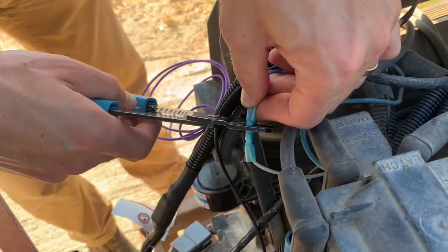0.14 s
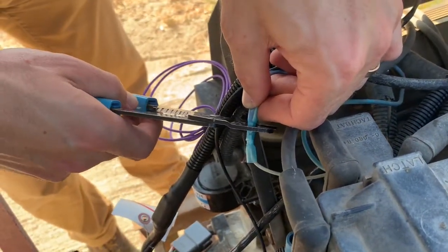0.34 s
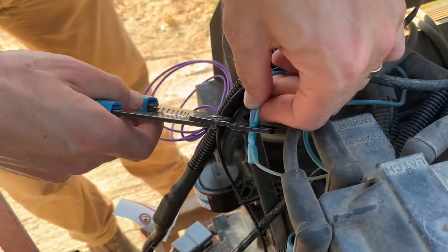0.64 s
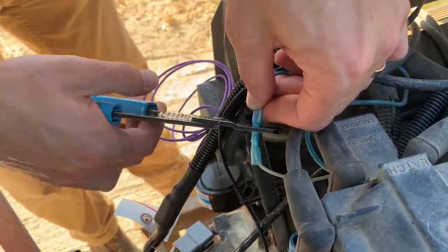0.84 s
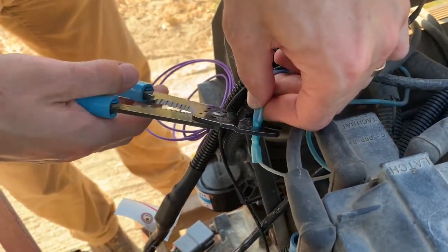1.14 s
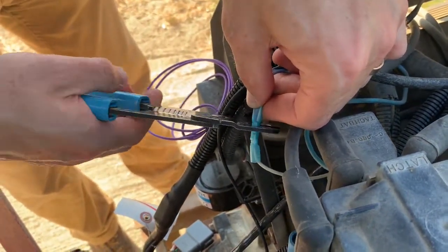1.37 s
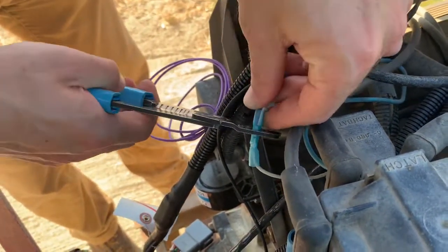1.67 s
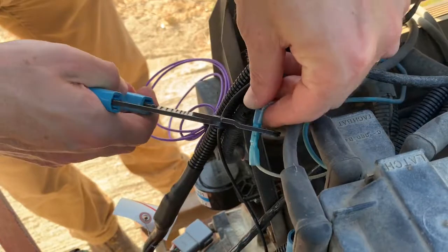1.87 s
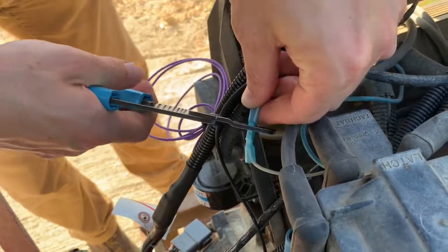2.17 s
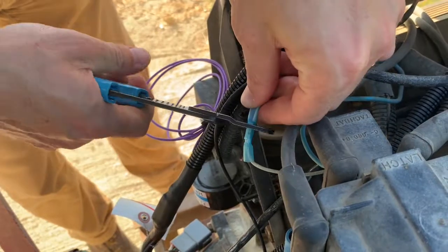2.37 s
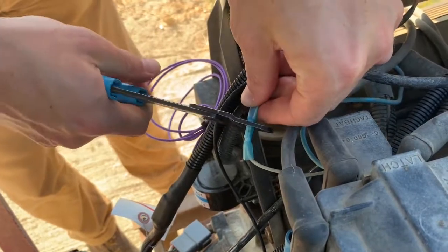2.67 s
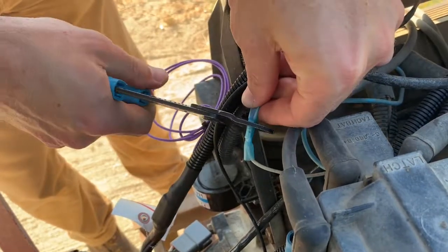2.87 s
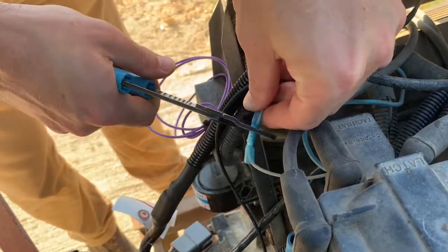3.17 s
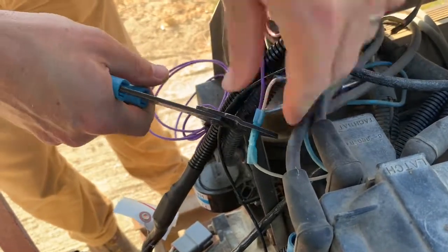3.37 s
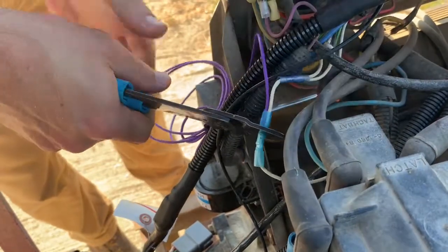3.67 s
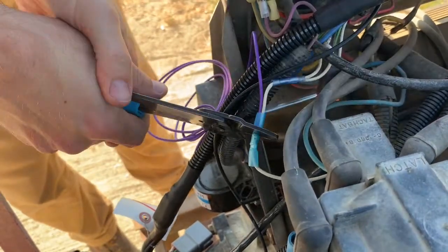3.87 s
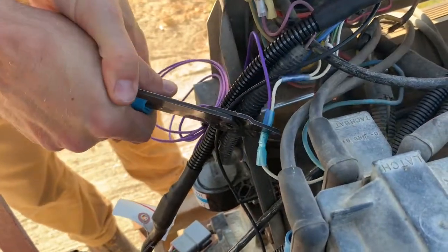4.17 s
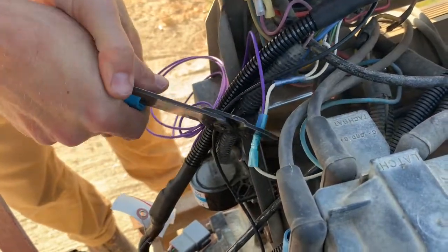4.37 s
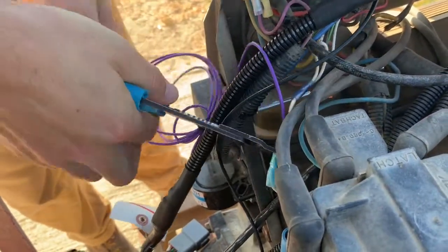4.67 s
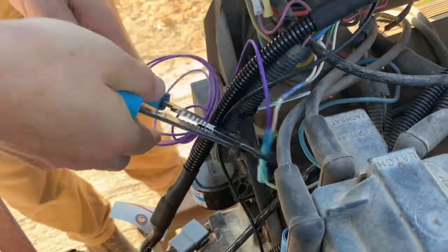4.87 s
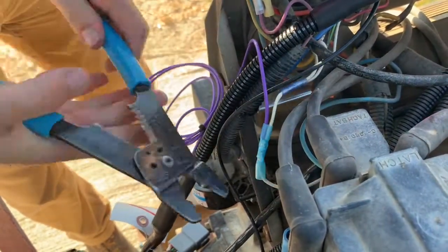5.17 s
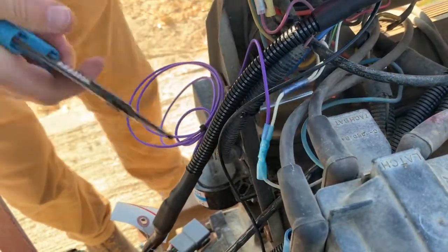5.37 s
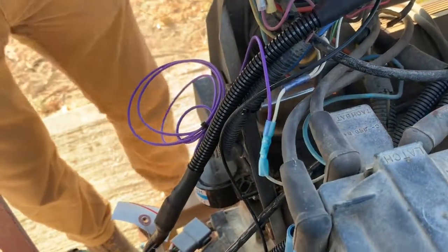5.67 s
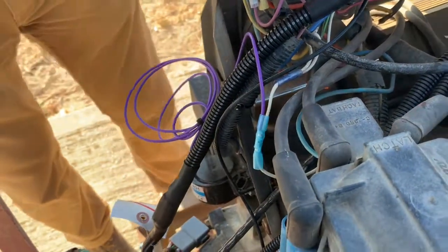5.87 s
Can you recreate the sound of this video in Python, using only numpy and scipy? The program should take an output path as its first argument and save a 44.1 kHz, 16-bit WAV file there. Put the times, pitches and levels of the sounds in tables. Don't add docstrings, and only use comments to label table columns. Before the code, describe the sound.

An uneven engine idles low nearby while hands rustle and tick at a tool, which finally snaps shut with a bright steel click.

```python
import sys
import numpy as np
from scipy import signal
from scipy.fft import rfft, irfft, next_fast_len
from scipy.io import wavfile

SR = 44100
rng = np.random.default_rng(int(sys.argv[2]) if len(sys.argv) > 2 else 0)


def how_loud(loudness_db):
    steps = np.asarray(loudness_db, float) / 20
    return 10 ** steps


def inscribe(sig):
    pcm = np.round(np.clip(np.atleast_2d(sig).T, -1, 1) * 32767)
    wavfile.write(sys.argv[1], SR, pcm.astype(np.int16))


N = 265923


def rms_one(x):
    return x / np.sqrt(np.mean(x ** 2) + 1e-20)


def in_time(rows):
    s, *columns = np.transpose(rows)
    return [np.interp(np.arange(N) / SR, s, c) for c in columns]


def at_hz(points, hz):
    table_hz, values = np.transpose(points)
    return np.interp(np.log(hz + 1), np.log(table_hz + 1), values)


def drift(rate):
    r = np.exp(-80 * np.pi * rate / SR)
    white = rng.standard_normal(N // 40 + 2002)
    slow = signal.lfilter([1], [1, -2 * r, r * r], white)[2000:]
    return np.interp(np.arange(N) / 40, np.arange(len(slow)), rms_one(slow))


def ring(clicks, hz, t60):
    r = np.exp(-np.log(1000) / (t60 * SR))
    w = 2 * np.pi * hz / SR
    return signal.lfilter([0, np.sin(w)], [1, -2 * r * np.cos(w), r * r], clicks + 1e-18)


def add(out, s, piece):
    i = round(s * SR)
    out[i:i + len(piece)] += piece[:len(out) - i]


def tone(hz, db, multiple=1, waver_db=1.5, slip=.3):
    phase = 2 * np.pi * multiple * np.cumsum(hz) / SR + 2.15 + slip * drift(3)
    return np.sqrt(2) * how_loud(db + waver_db * drift(5.6)) * np.sin(phase)


# (f/Hz, share [0-1])
LIKENESS = [(30, .45), (70, .8), (130, .95), (300, .8), (700, .45), (2000, .3), (5000, .4), (8000, .55),
            (9200, .75), (11000, .965)]


def banded_noise(spectrum, low_hz, count, patchy_db, shared):
    out = 0
    together = .3 * drift(.8) + drift(8)
    edges = low_hz * 2 ** (np.arange(count + 1) / 3)
    white = rng.standard_normal((2, 3, N))
    for k, (low, high) in enumerate(zip(edges, edges[1:])):
        hz = np.sqrt(low * high)
        alike = np.clip(at_hz(LIKENESS, hz), 0, 1)
        gain = how_loud(at_hz(spectrum, hz) + patchy_db * (shared * together + drift(19.0)))
        band_pass = signal.butter(2, [low, high], "band", fs=SR, output="sos")
        band = signal.sosfilt(band_pass, white[k % 2])
        out = out + gain * band * np.sqrt([[alike], [1 - alike], [1 - alike]])
    return out / np.sqrt(np.mean(out[0] ** 2 + out[1] ** 2))


# (f/Hz, level/dB per Hz)
RUMBLE = [(20, 0), (48, -3.5), (80, -2.5), (125, -3), (170, -21), (246, -17), (335, -28), (420, -30.5),
          (1060, -27.5), (1400, -46)]


def rumble():
    return how_loud(-46.5) * banded_noise(RUMBLE, 19.82, count=18, patchy_db=3.0, shared=0.12)


# (f/Hz, level/dB per Hz)
HISS = [(760, -35), (1300, -8), (1670, -8.5), (2120, -2.5), (2980, -2.5), (4070, -4), (5120, 1), (5860, -7),
        (6370, -5), (6990, -7), (9160, -5), (11600, -5.5), (14600, -3.5)]
# (t/s, level/dB)
BREEZE = [
    (0, -1.5),
    (.25, 0.5),
    (2.2, 2),
    (4.2, 3.5),
    (5.2, 1.5),
    (6.03, 0),
]


def hiss():
    level = how_loud(-54 + in_time(BREEZE)[0])
    return level * banded_noise(HISS, 1289, count=11, patchy_db=1.8, shared=0.4)


# (t/s, f/Hz)
HUM_LOW = [(0, 62.7), (1, 61), (1.3, 63), (3.1, 63.2), (3.5, 65), (4.4, 64.7), (4.75, 60.2), (5.4, 59.5),
           (6.03, 62.5)]


def hums():
    t = np.arange(N) / SR
    from_nearest_s = t - 4.9
    nearing_db_per_s, leaving_db_per_s = 1.5, .5
    off_db = np.maximum(-nearing_db_per_s * from_nearest_s, leaving_db_per_s * from_nearest_s)
    low = tone(in_time(HUM_LOW)[0], -47)
    high_hz = 71.1 + .2774 * t
    return low + tone(high_hz, -46.5 - off_db)


# (t/s, f/Hz)
VEHICLE = [(0, 100), (.49, 101.4), (1, 105.6), (1.36, 104.5), (1.7, 108.3), (2.1, 106.5), (2.5, 108),
           (2.75, 108.6), (3.33, 110), (3.56, 112), (3.97, 111.9), (4.4, 113.6), (4.8, 114.7), (5.3, 115.6),
           (6.03, 117.6)]
# (multiple of firing rate, level/dB re whine, hidden from t/s)
WHINE = [(3, 0, 4.9), (4, -15, .45), (5, -15, .8), (6, -9, 3.5), (8, -15, 1.4), (9, -9, 1.35),
         (10, -12, 2.6)]


def vehicle():
    (hz,), t = in_time(VEHICLE), np.arange(N) / SR
    fade_db_per_s, hidden_db_per_s = 4, 66
    whine_db = -59 - fade_db_per_s * np.maximum(t - 1.39, 0)
    shut_db = np.interp(t, [.35, .7], [-12, 0])
    whine = 0
    for k, db, hidden_s in WHINE:
        shadow_db = hidden_db_per_s * np.maximum(t - hidden_s, 0)
        order_db = whine_db + db + shut_db * (k > 5) - shadow_db
        whine = whine + tone(hz, order_db, multiple=k, slip=.5)
    return tone(hz, -44.5) + whine


# (multiple of firing rate, level/dB)
TURNED = [
    (4, -74),
    (7, -75),
]


def vehicle_turned():
    t = np.arange(N) / SR
    turn_s, turn_takes_s, gone_s, fade_s = 4.55, .3, 5.75, .15
    turned = np.clip(np.minimum((t - turn_s) / turn_takes_s, (gone_s - t) / fade_s), 0, 1)
    (hz,) = in_time(VEHICLE)
    return turned * sum(tone(hz, db, multiple=k, waver_db=2.0, slip=.7) for k, db in TURNED)


# (t/s, firings [1/s])
IDLE = [(0, 22.194), (.5, 21.939), (1, 21.526), (1.45, 21.549), (1.6, 21.326), (1.75, 21.511),
        (1.95, 20.429), (2.3, 20.069), (2.6, 19.549), (3.3, 19.795), (3.6, 19.61), (4.2, 19.607),
        (4.45, 20.447), (4.7, 20.592), (4.95, 21.332), (5.25, 22.603), (5.6, 21.918), (6.03, 21.84)]
# (t/s, level/dB, extra level/dB of the upper exhaust notes)
LOAD = [(0, 1, 2), (1.15, 1.5, -2), (1.35, 2.5, 3.5), (1.55, -6.5, 11), (1.9, -0.5, 5), (2.7, 0, 3.5),
        (4.2, 0, 6), (5.3, 3.5, 1.5), (6.03, 2, -4)]
# (f/Hz, level/dB, t60/s, sign)
EXHAUST = [(44, -51, .2, 1), (80, -48, .25, 1), (93, -43, .4, 1), (116.8, -28.5, .134, -1),
           (147.6, -40, .046, 1), (187, -51, .12, 1)]


def idling_engine():
    (per_s,), (level_db, upper_db) = in_time(IDLE), in_time(LOAD)
    turns = .42 + np.cumsum(per_s) / SR + .011 * drift(2)
    fired = np.diff(np.floor(turns), prepend=0) > 0
    puffs = fired * how_loud(level_db + 1.0 * drift(12))
    pipe = 0
    for hz, db, t60, sign in EXHAUST:
        drive = puffs * how_loud(upper_db * (hz > 140))
        pipe = pipe + sign * how_loud(db) * ring(drive, hz, t60)
    return signal.sosfilt(signal.butter(4, 230, fs=SR, output="sos"), pipe)


# (start t/s, length/s, level/dB, centre f/Hz)
SHIFTS = [(0.152, 0.094, -62.5, 3750), (0.257, 0.1, -73, 2900), (0.167, 0.17, -64, 7600),
          (0.203, 0.095, -67.5, 1170), (0.467, 0.63, -61, 8650), (0.496, 0.8, -64, 11000),
          (0.55, 0.66, -82, 14800), (0.607, 0.15, -58.5, 7100), (0.777, 0.15, -55.5, 7200),
          (0.948, 0.16, -58.5, 6900), (0.537, 0.62, -60.5, 13000), (1.417, 0.76, -64, 3670),
          (1.441, 0.68, -64, 2600), (1.446, 0.75, -63, 5000), (1.53, 0.4, -66.5, 7000),
          (2.177, 0.8, -61, 13000), (2.203, 0.62, -66, 8100), (2.842, 0.45, -68.5, 4800),
          (3.135, 0.25, -77, 2270), (3.353, 0.15, -67, 4600), (3.797, 0.094, -60, 3100),
          (3.896, 0.059, -60, 3500), (3.8, 0.16, -65, 2240), (4.252, 0.13, -62.5, 3500),
          (4.44, 0.13, -61.5, 3500), (3.747, 1.7, -68.5, 8650), (5.417, 0.12, -64.5, 3550),
          (3.758, 0.15, -59.5, 345), (1.548, 0.085, -63, 1230), (5.938, 0.038, -63, 590),
          (4.6, .7, -67.5, 330), (0.1, 0.343, -72.5, 1700)]


def grip():
    slips_per_s, slip_cycles, spread_oct = 1200, 55, .17
    attack_s, release_s = .0087, .0066
    sizes = how_loud(3.0 * np.minimum(rng.exponential(1, N), 4)) * rng.choice([-1, 1], N)
    chance, clumps = rng.random(N), how_loud(3.9 * drift(16))
    dealt = rng.integers(0, 6, N)
    out = np.zeros(N)
    for (s, length_s, db, hz), notes in zip(SHIFTS, rng.uniform(-1.34, 1, (len(SHIFTS), 6))):
        t = np.arange(int((length_s + release_s) * SR)) / SR
        part = (int(s * SR) + np.arange(len(t))) % N
        slips = sizes[part] * (chance[(part * 7) % N] < slips_per_s * clumps[part] / SR)
        offsets_oct = spread_oct * (np.linspace(-1, 1, 6) + .2 * notes)
        pitches = np.minimum(hz * 2 ** offsets_oct, 15000)
        rustle = sum(ring(slips * (dealt[part] == k), f, slip_cycles / f) for k, f in enumerate(pitches))
        shape = np.clip(np.minimum(t / attack_s, (t[-1] - t) / release_s), 0, 1)
        add(out, s, how_loud(db) * shape * rms_one(rustle))
    return out


# (start t/s, length/s, level/dB, f/Hz)
SQUEAKS = [(0.179, 0.067, -66, 4030), (0.182, 0.07, -68, 3780), (0.304, 0.035, -63, 3180),
           (0.38, .04, -71, 3260), (0.661, 0.049, -59, 6700), (0.801, 0.072, -57.5, 9000),
           (0.818, 0.037, -58, 5840), (3.306, 0.078, -65, 2520), (3.336, 0.063, -67, 2100),
           (3.354, 0.03, -61, 4250), (3.376, 0.022, -59, 3900), (3.464, 0.028, -59, 4200),
           (3.504, 0.087, -68, 4240), (4.104, 0.093, -66, 2270), (4.929, 0.043, -59.5, 1760),
           (5.127, 0.051, -68, 3600)]


def squeaks():
    t60_s, edge_s = .025, .008
    out = np.zeros(N)
    for (s, length_s, db, hz), grain in zip(SQUEAKS, rng.standard_normal((len(SQUEAKS), 6000))):
        t = np.arange(int(min(length_s, .13) * SR)) / SR
        shape = np.clip(np.minimum(t, t[-1] - t) / edge_s, 0, 1)
        note = rms_one(ring(grain, hz, t60_s))[-len(t):]
        add(out, s, how_loud(db) * shape * note)
    return out


# (t/s, peak level/dB, centre f/Hz)
TICKS = [(.5405, -46, 6540), (.6393, -34, 6800), (0.677, -36, 6830), (.7171, -44, 7490), (.755, -46, 8940),
         (.8164, -41, 9120), (0.8386, -30, 8200), (.9027, -45, 8200), (.9286, -53, 8900),
         (1.1112, -35, 9000), (1.5299, -46, 12500), (1.5628, -39, 12500), (2.101, -37, 12500),
         (2.211, -31, 12700), (2.239, -46, 12600), (2.2799, -36, 12600), (2.2957, -38, 12900),
         (2.317, -34, 12750), (2.3481, -38, 12200), (2.361, -27.5, 12250), (2.371, -32, 12400),
         (2.406, -33, 12500), (2.4297, -32, 8700), (2.4296, -44, 12800), (2.382, -40, 13000),
         (2.4778, -40, 13100), (2.4955, -27.5, 12500), (2.517, -28.5, 13400), (2.533, -42, 12600),
         (2.598, -34.5, 11900), (2.6253, -32, 12600), (2.6696, -33, 12300), (2.678, -33, 9000),
         (2.707, -35, 12500), (2.7352, -28, 11400), (2.7494, -33, 13600), (3.2697, -35, 8100),
         (3.4276, -42, 12500), (3.4904, -38, 12500), (3.7325, -35, 12500), (4.056, -35, 12500),
         (4.1838, -30, 12300), (4.2028, -38, 12700), (4.6227, -28, 12200), (4.648, -38, 12500),
         (4.8648, -34, 12500), (4.9067, -36, 12500), (4.9536, -37, 12700), (5.032, -32, 12500),
         (5.102, -28, 9400), (5.1817, -45, 12700), (5.9333, -38, 7500)]


def ticks():
    out, t = np.zeros(N), np.arange(400) / SR
    thin = signal.butter(2, 4500, "high", fs=SR, output="sos")
    for (s, db, hz), grain in zip(TICKS, rng.standard_normal((len(TICKS), 400))):
        crack = grain * np.exp(-t / .0008)
        crack = .5 * signal.sosfilt(thin, crack) + .3 * ring(crack, hz, .003)
        add(out, s, how_loud(db - 3.5) * crack / abs(crack).max())
    return out


# (t/s, peak level/dB, ring f/Hz)
TAPS = [(1.499, -54, 2500), (1.568, -45, 2240), (1.621, -51, 1350), (1.652, -48, 4360),
        (1.796, -42.5, 2530), (3.271, -39, 4400), (3.272, -52, 2900), (3.413, -46, 1300),
        (3.756, -50, 1110), (3.807, -45, 970), (3.81, -42, 1240), (3.853, -51, 2620), (3.936, -42, 3100),
        (0.949, -42, 6330), (.99, -41, 6500), (1.021, -48, 6500), (1.053, -48, 6500), (1.08, -50, 6500),
        (4.185, -41, 4000), (4.186, -49, 1290), (4.36, -50, 3050), (4.613, -47, 1280), (4.6235, -39, 3300),
        (4.624, -40, 4100), (4.6225, -44, 1740), (4.649, -36, 4180), (4.912, -42, 3300), (4.94, -40, 1780),
        (5.058, -35.5, 3480), (5.102, -45.5, 1240), (5.1, -40.5, 2520), (5.102, -37, 5200),
        (5.1026, -44, 3670), (5.189, -46.5, 2800), (5.942, -51, 1490), (5.9425, -55, 950),
        (5.058, -50, 1970), (5.058, -44, 4500)]


def taps():
    out, t = np.zeros(N), np.arange(2000) / SR
    for (s, db, hz), grain in zip(TAPS, rng.standard_normal((len(TAPS), 2000))):
        touch = grain * np.exp(-t / .0012)
        t60 = .010 * np.sqrt(3000 / hz)
        band = signal.butter(2, [hz / 1.6, hz * 2], "band", fs=SR, output="sos")
        body = ring(touch, hz, t60) + .15 * ring(touch, hz * .78, t60)
        body = body + hz / 900 * signal.sosfilt(band, touch)
        add(out, s, how_loud(db) * body / abs(body).max())
    return out


# (t/s, peak level/dB)
KNOCKS = [
    (2.436, -20),
    (2.517, -26.5),
    (3.811, -40),
]


def knocks():
    out, t = np.zeros(N), np.arange(16000) / SR
    strike = t == 0
    hz = 30 + 270 * np.exp(-t / 0.0065)
    wave = np.sin(2 * np.pi * np.cumsum(hz) / SR)
    wave = wave * np.exp(-t / 0.03) * (1 - np.exp(-t / 0.0025)) ** 2
    frame_t60_s, rebound_delay_s = .4, .030
    shake = ring(strike, 53.4, frame_t60_s) + ring(strike, 32.5, frame_t60_s)
    shake = how_loud(-5.5) * shake * (1 - np.exp(-t / 0.048))
    rebound = -how_loud(-3) * ring(strike, 122, .1) * (1 - np.exp(-t / 0.0028))
    for s, db in KNOCKS:
        add(out, s, how_loud(db) * (shake + wave))
        add(out, s + rebound_delay_s, how_loud(db) * rebound)
    return out


# (t/s, level/dB, brightness [dB per octave])
SNAP = [
    (5.3475, -25, 23),
    (5.3484, -13, 4),
    (5.3501, -19.5, 8),
    (5.3529, -18, 6.5),
]
# (f/Hz, level/dB, t60/s)
STEEL = [(370, -12.5, 0.04), (537, -18, 0.24), (750, -11, 0.093), (940, -10.5, 0.13), (1210, -12, 0.021),
         (1430, -5, 0.016), (1740, -12.5, 0.038), (2240, -5, 0.017), (2780, -5.5, 0.024),
         (3300, -8.5, 0.0077), (4650, -8, 0.022), (4900, -17, 0.034), (5240, -5.5, 0.067),
         (5480, -14.5, 0.044), (5600, -11, 0.015), (6600, -4.5, 0.016), (7000, -14, 0.075),
         (7660, -18, 0.012), (8280, -5, 0.0085), (8800, -3.5, 0.0067), (9200, -5, 0.0063),
         (10000, -10, 0.0094), (10540, -12, 0.014), (12500, -16.5, 0.0079), (13680, -14, 0.0069),
         (15500, -22, .006)]


def snap():
    out, t = np.zeros(N), np.arange(4000) / SR
    for (s, db, bright_db), spread in zip(SNAP, rng.standard_normal((len(SNAP), len(STEEL)))):
        modes = 0
        for k, ((hz, level, t60), e) in enumerate(zip(STEEL, spread)):
            strength = how_loud(level + 2.1 * e + bright_db * np.log2(hz / 10000))
            modes = modes + (-1) ** k * strength * ring(t == 0, hz, t60)
        crack = how_loud(-13.0) * np.diff(rng.standard_normal(len(t)), prepend=0) * np.exp(-t / 0.0008)
        add(out, s, how_loud(db) * (modes + crack))
    held = np.clip(np.arange(N) / SR - 5.358, 0, 1)
    return out * (.22 + .78 * np.exp(-held / .002))


# (f/Hz, left-right level/dB)
BALANCE_DB = [(60, 0), (130, 2), (290, 2.5), (640, -5), (1410, -3.0), (3100, -2.5), (6820, -0.5),
              (10000, 1), (16000, -0.5)]


def microphones(common, own, lead_rad, balance_db=BALANCE_DB):
    tail = 4096
    size = next_fast_len(N + tail)
    hz = np.arange(size // 2 + 1) * SR / size
    lead = np.interp(hz, *np.transpose(lead_rad))
    fade = np.minimum(1, (N + tail - np.arange(N + tail)) / tail)
    common = np.pad(common, (0, tail), "reflect") * fade
    left = irfft(rfft(common, size) * np.exp(1j * lead), size)[:N + tail]
    tilt = how_loud(at_hz(balance_db, hz) / 2)
    own = np.pad(own + np.zeros((2, N)), [(0, 0), (0, tail)])
    both = rfft([left, common] + own, size) * [tilt, 1 / tilt]
    return irfft(both, size)[:, :N]


# (f/Hz, left lead [rad])
LEAD = [(0, 0), (430, -0.7), (1210, -5.7), (1640, -3.8), (4570, -15.5), (6720, -19.5), (9040, -18.0),
        (10650, -15.71), (12750, -12.57), (15150, -9.42), (17000, -7.5)]
# (f/Hz, left lead [rad])
TAP_LEAD = [(0, 0), (7000, -1), (9040, .85), (10650, 3.14), (12750, 6.28), (15150, 9.42), (17000, 11.3)]
# (f/Hz, left lead [rad])
SNAP_LEAD = [(0, -0.5), (1500, 2), (3100, 0.5), (4300, -2.5), (5250, -1.5), (7000, -1.5), (8200, 1),
             (10300, 3), (15200, 9)]
# (f/Hz, left-right level/dB)
SNAP_BALANCE_DB = [(200, 10), (700, -2), (1290, -5), (2380, 1), (4400, 4), (8120, 1.5), (15000, 1.5)]


def scene():
    air = rumble() + hiss()
    engines = hums() + vehicle() + vehicle_turned() + idling_engine()
    around = microphones(air[0] + engines + knocks(), air[1:], LEAD)
    hands = microphones(grip() + squeaks() + ticks() + taps(), 0, TAP_LEAD)
    return around + hands + microphones(snap(), 0, SNAP_LEAD, SNAP_BALANCE_DB)


def roll_off(x):
    return signal.sosfilt(signal.butter(12, 15850, fs=SR, output="sos"), x)


def record(dry):
    low_pass = signal.cheby2(8, 40, 16350, fs=SR, output="sos")
    mix = signal.sosfilt(low_pass, dry)
    return roll_off(mix)


dry = scene()
out = record(dry)
inscribe(out)
```